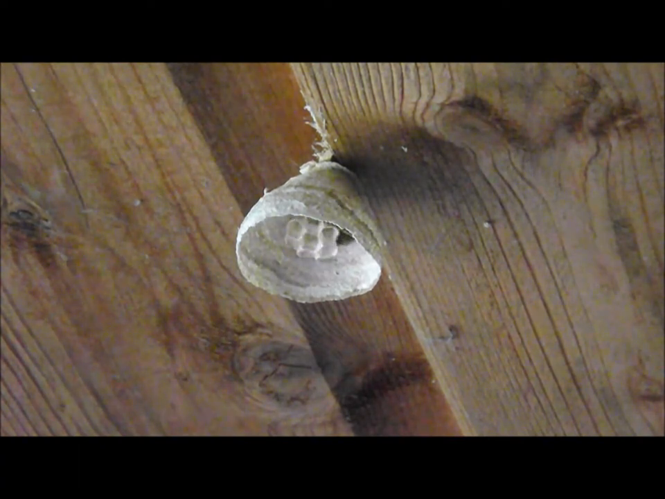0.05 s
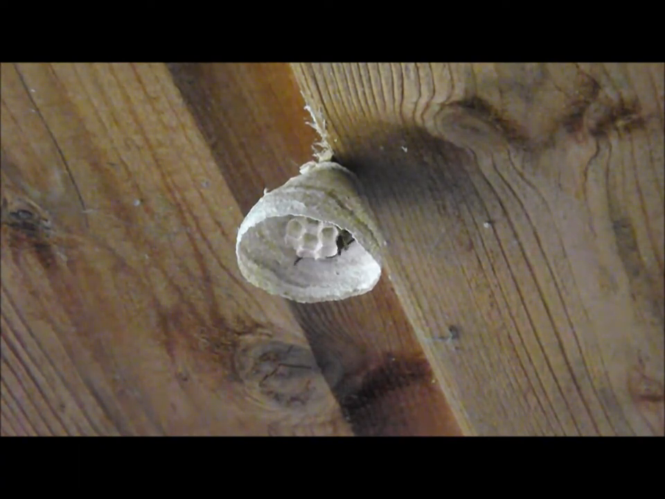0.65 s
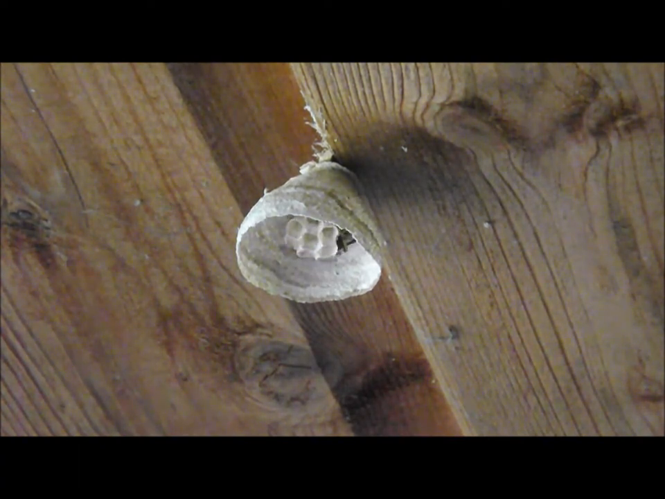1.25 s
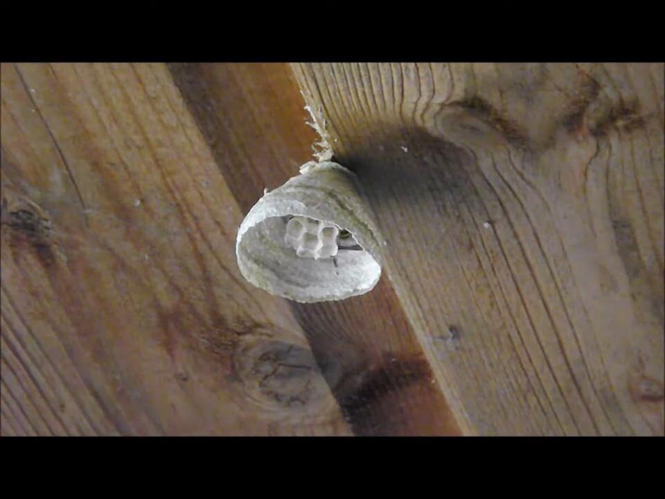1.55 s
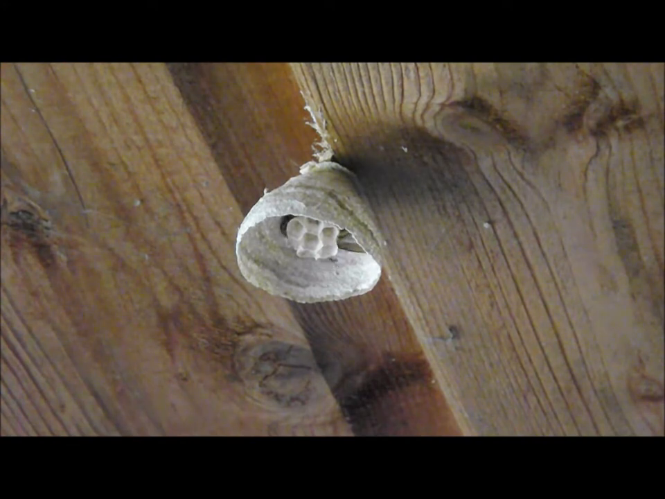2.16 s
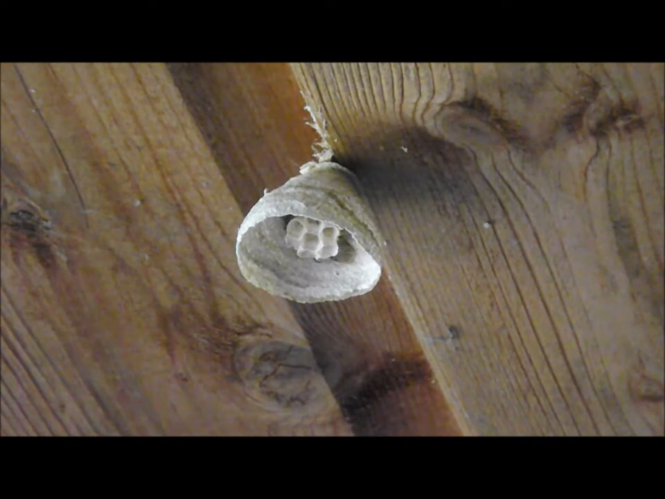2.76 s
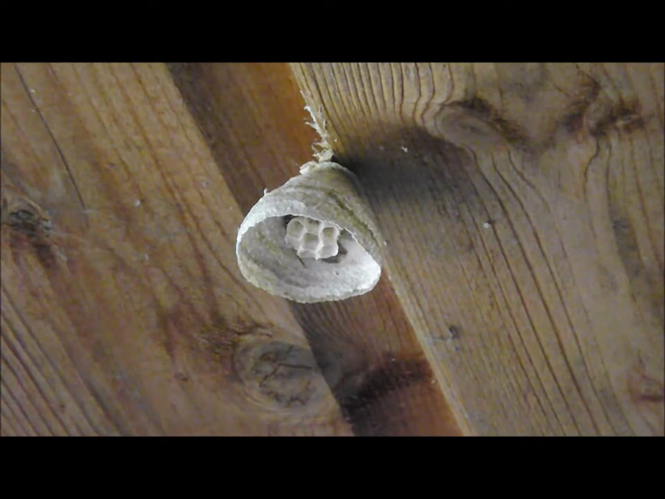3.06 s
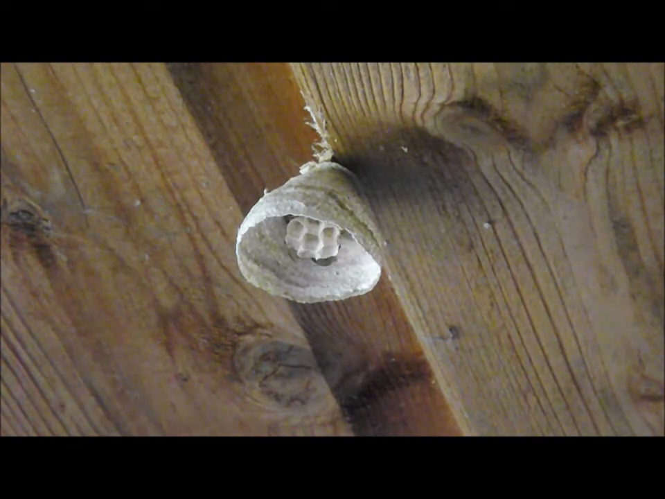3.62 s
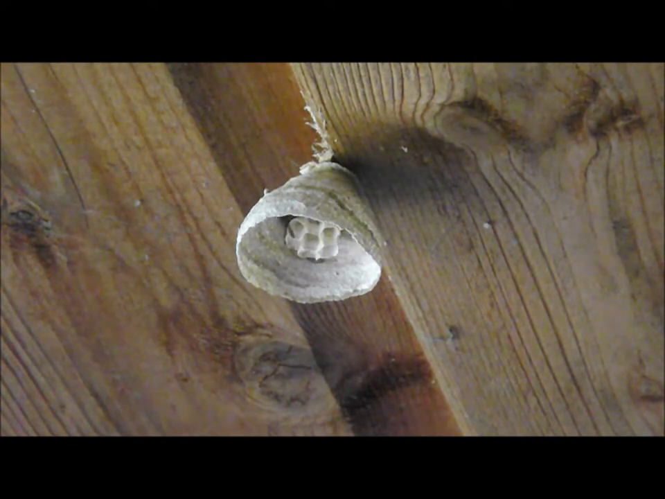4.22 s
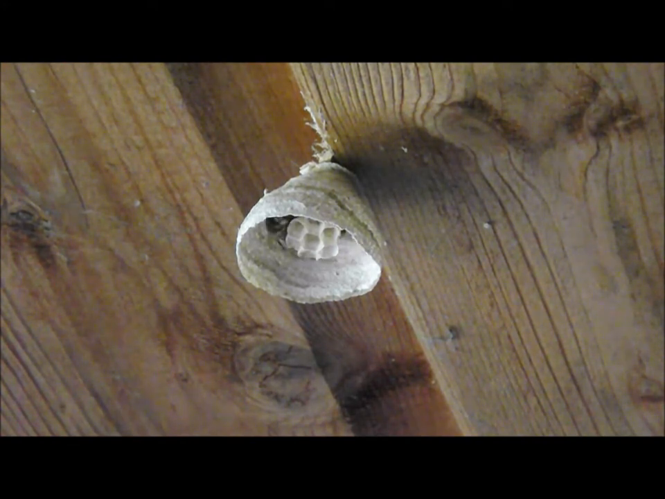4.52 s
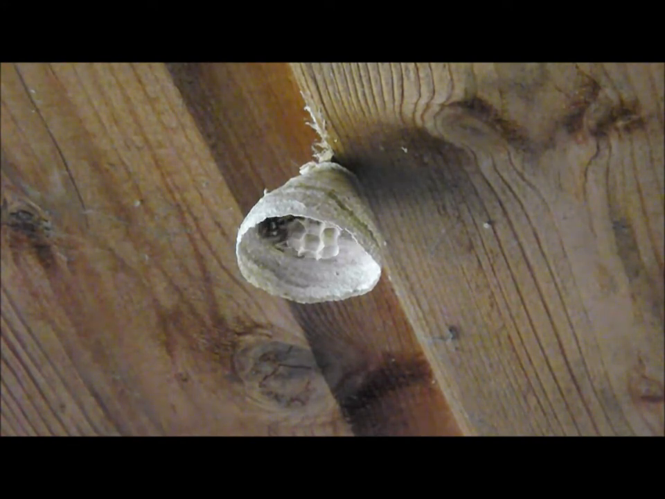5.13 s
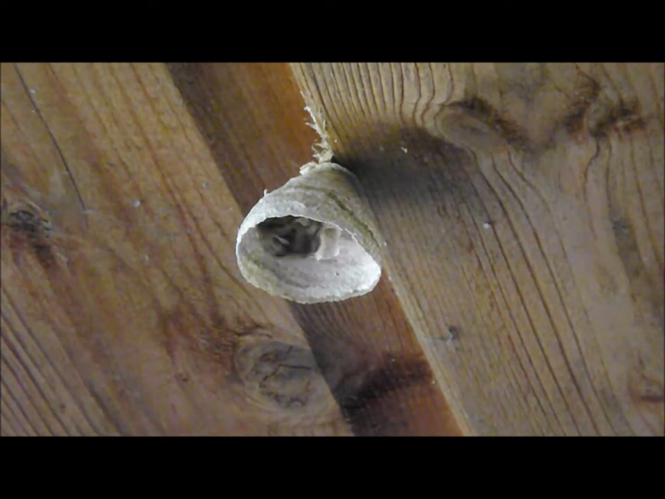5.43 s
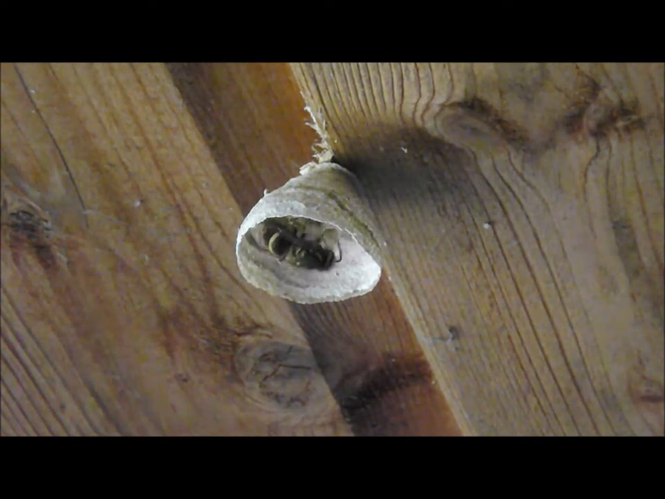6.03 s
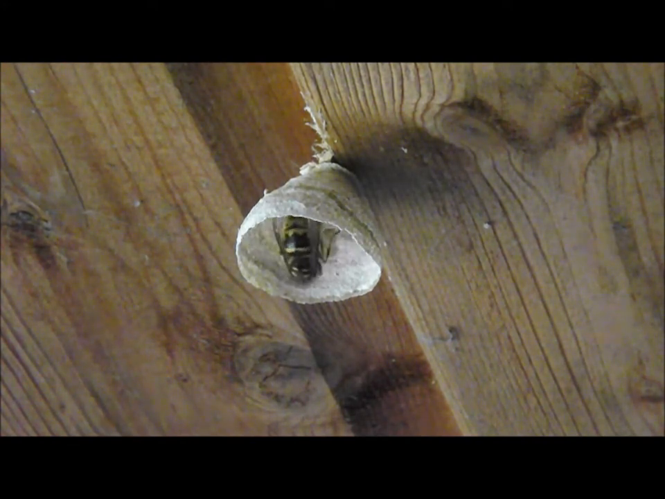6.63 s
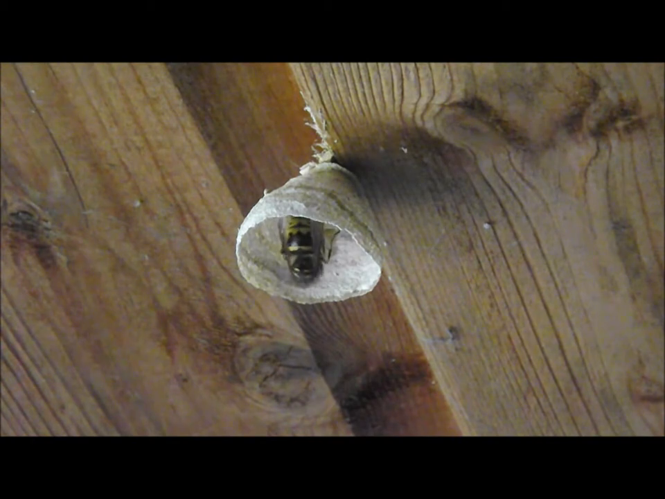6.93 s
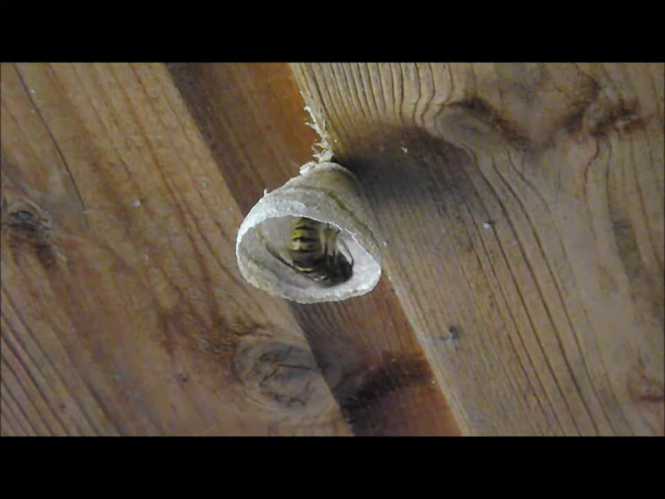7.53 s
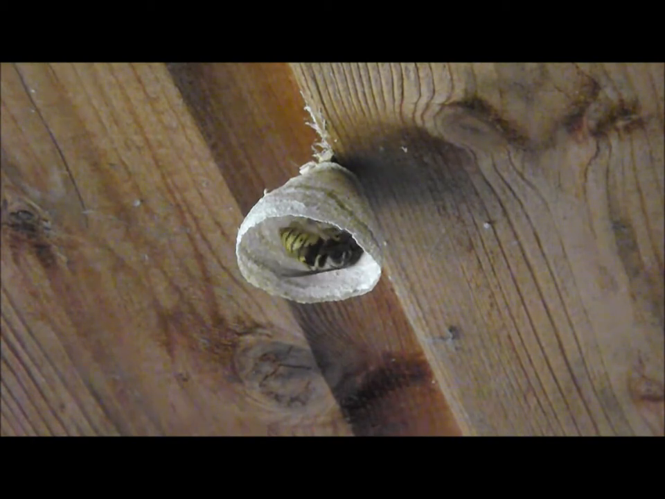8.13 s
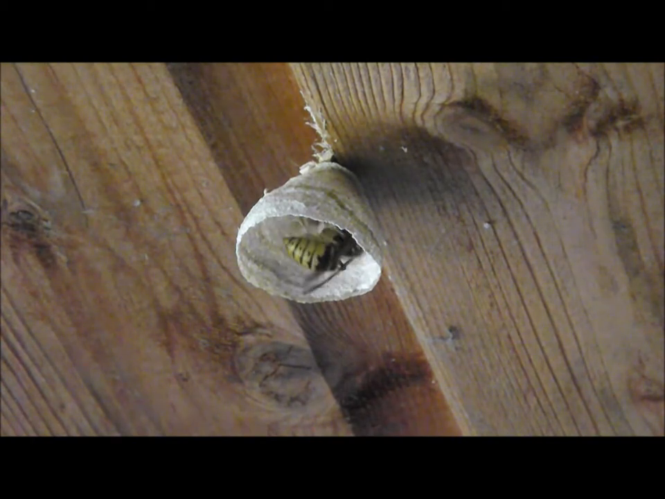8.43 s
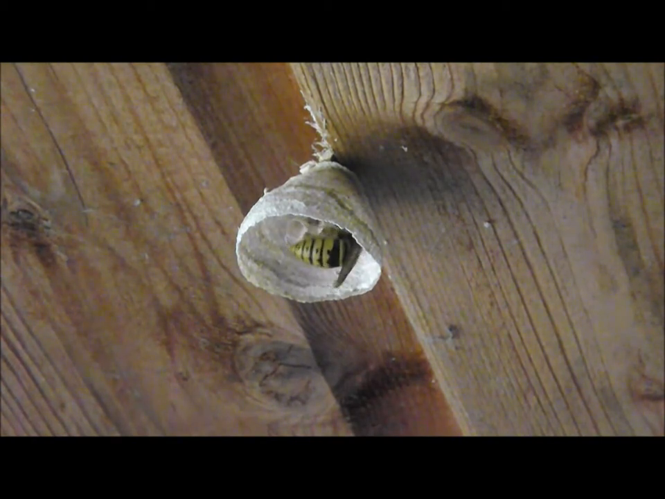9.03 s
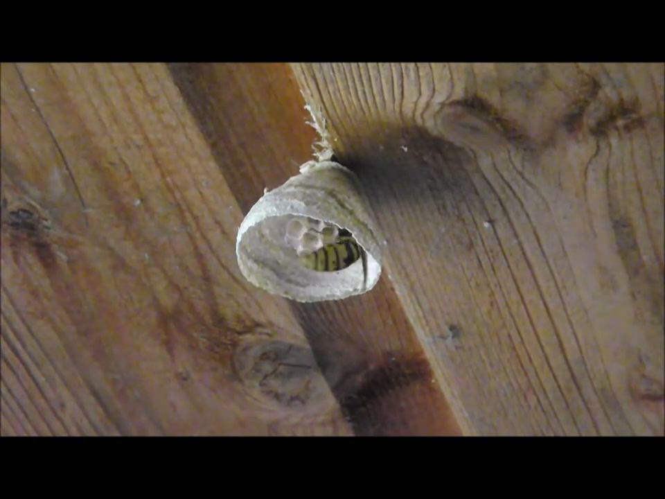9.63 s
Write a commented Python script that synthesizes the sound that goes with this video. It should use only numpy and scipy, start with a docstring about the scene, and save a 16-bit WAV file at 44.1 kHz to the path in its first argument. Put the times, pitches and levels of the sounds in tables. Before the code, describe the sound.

In a quiet wooden shed, a camera whirrs right at its own microphone with a thin, rapid, high ticking over soft hiss. Low traffic rumble comes through the boards throughout. A distant engine slowly rises in pitch, and small birds chirp faintly outside, mostly a little before the middle. The timber then gives two soft knocks, with a fainter one near the end.

```python
"""Camera running in a quiet shed

Under the roof of a wooden shed, heard from the camera's own stereo microphone.
Right at the microphone the works whirr in the case and ping once a frame, over a bed of hiss.
The timber gives a few soft knocks. From outside, through the boards, come a low traffic rumble,
a distant engine slowly speeding up, and the chirps of small birds."""
import sys
import numpy as np
from scipy import signal
from scipy.fft import rfft, irfft
from scipy.io import wavfile

SR = 44100
rng = np.random.default_rng(int(sys.argv[2]) if len(sys.argv) > 2 else 0)


def transcribe(u):
    """Save the signal u as a 16-bit wav file named by the first command-line argument.

    u: samples, shape (n,) or (channels, n), limited to [-1, 1]; the rate is SR.
    q: integer samples, one column per channel.
    """
    v = np.clip(np.atleast_2d(u).T, -1, 1)
    q = np.round(v * 32767).astype(np.int16)
    wavfile.write(sys.argv[1], SR, q)


N = 435266
TIME = np.arange(N) / SR
BIN_HZ = np.maximum(np.fft.rfftfreq(N, 1 / SR), 1)
FRAME_HZ = 29.4953

# resonances of the camera case: pitch_hz, width_hz, density_db
CASE_MODES = [(1072, 60, -82), (1511, 89, -84), (2053, 183, -84), (2437, 290, -80), (2712, 230, -74.5),
              (2800, 290, -77), (3123, 203, -73), (3330, 194, -74), (3777, 410, -82.5), (4344, 320, -88.5),
              (4680, 180, -92), (5280, 780, -102), (5880, 270, -103), (6250, 390, -102)]


def from_db(db):
    """Decibels to gain."""
    return 10 ** (np.asarray(db) / 20)


def arch(progress):
    """A smooth rise and fall as progress goes from 0 to 1."""
    return np.sin(np.pi * np.clip(progress, 0, 1))


def resonance(hz, width_hz):
    """Gain of a steep-sided resonance, 1 on top."""
    return 1 / (1 + (2 * (BIN_HZ - hz) / width_hz) ** 2)


def noise(gain):
    """Noise whose density per Hz follows the gain."""
    return irfft(rfft(rng.standard_normal(N)) * gain, N) * np.sqrt(SR / 2)


def coloured_noise(spectrum):
    """Noise whose spectrum runs through the given points."""
    hz, db = np.transpose(spectrum)
    return noise(from_db(np.interp(np.log(BIN_HZ), np.log(hz), db)))


def resonant_noise(modes):
    """Noise that excites each resonance of a body on its own."""
    power = sum((from_db(db) * resonance(hz, width)) ** 2 for hz, width, db in modes)
    return noise(np.sqrt(power))


def waver(rate_hz):
    """Slow random wavering up to the given rate; spread 1."""
    slow = noise(1 / (1 + (BIN_HZ / rate_hz) ** 4))
    return slow / slow.std()


def note(start_s, length_s, middle_hz, glide_hz, db, bend=0):
    """A near-sine note that glides through its middle pitch; both ends sag by the share bend."""
    progress = np.clip((TIME - start_s) / length_s, 0, 1)
    hz = middle_hz * (1 - bend * (2 * progress - 1) ** 2) + glide_hz * (progress - .5)
    return from_db(db) * arch(progress) ** .5 * np.sin(2 * np.pi * np.cumsum(hz) / SR)


def microphone_hiss(shared_power=.68):
    """The microphone's own noise, partly common to the two channels."""
    # noise floor: frequency_hz, density_db
    floor = [(200, -120), (1000, -107), (2000, -101), (4000, -101), (5200, -104), (7000, -103.7),
             (10000, -103.3), (13000, -105.7), (15700, -107.8)]
    common = coloured_noise(floor)
    separate = np.array([coloured_noise(floor), coloured_noise(floor)])
    return np.sqrt(shared_power) * common + np.sqrt(1 - shared_power) * separate


def far_traffic(drone_rise_hz_per_s=3.2):
    """Far traffic: a swelling bass rumble with passing drones, under a soft wash."""
    # rumble through the boards: frequency_hz, density_db
    rumble_spectrum = [(10, -54.5), (22, -50.5), (35, -52), (48, -54.5), (66, -60), (76, -58.5),
                       (90, -63.5), (102, -68.5), (160, -84), (400, -104), (2000, -140)]
    # wash of traffic and air: frequency_hz, density_db
    wash_spectrum = [(100, -82), (200, -80), (270, -84), (315, -81.5), (390, -86), (900, -86),
                     (1750, -88.5), (2300, -91.5), (5000, -114), (9000, -135)]
    # slow swell of the outdoors: time_s, rumble_gain_db, wash_gain_db
    swell = [(0, -2, -0.5), (.8, 2.5, -0.5), (1.8, -2, 0), (3, 0, -.5), (4.5, 0.5, -0.7), (5.7, -0.5, -0.5),
             (6.5, 1.5, 0.5), (7.5, -1, 0.5), (8.2, 2, 1.5), (8.8, 0, 0.2), (9.87, 0, 1.5)]
    # brief low drones: start_s, length_s, pitch_hz, level_db
    drone_notes = [(0.452, 0.46, 76.5, -43), (2.552, 0.56, 75.5, -45), (6.646, 0.89, 60, -39.5),
                   (7.957, 1.13, 83, -44.5), (8.895, 0.86, 44.4, -33.5)]
    time_s, rumble_db, wash_db = np.transpose(swell)
    rumble = from_db(np.interp(TIME, time_s, rumble_db)) * coloured_noise(rumble_spectrum)
    wash = from_db(np.interp(TIME, time_s, wash_db)) * coloured_noise(wash_spectrum)
    drones = sum(note(start, length, hz, drone_rise_hz_per_s * length, db)
                 for start, length, hz, db in drone_notes)
    return rumble + wash + drones


def distant_engine(start_hz=26.43, octaves_per_s=.26, second_db=-25, throb_hz=8, throb_db=1.0):
    """An engine speeds up; only its firing tone and a faint second harmonic get through the walls."""
    # the sound arrives in waves: start_s, length_s, level_db
    waves = [(2.05, 0.57, -35.5), (2.502, 0.58, -28), (3.05, 0.55, -31), (3.346, 0.65, -24.5),
             (3.908, .41, -25), (4.52, .48, -28), (4.878, 0.43, -31), (5.404, 0.43, -34.5)]
    firing_hz = start_hz * 2 ** (octaves_per_s * (TIME - waves[0][0]))
    phase = 2 * np.pi * np.cumsum(firing_hz) / SR
    tone = np.sin(phase) + from_db(second_db) * np.sin(2 * phase)
    swells = [from_db(db) * arch((TIME - start) / length) ** .58 for start, length, db in waves]
    throb = from_db(throb_db * waver(throb_hz))
    return np.sqrt(2) * np.max(swells, axis=0) * throb * tone


def birds(chip_s=.0325, lower_voice_ratio=.872, flutter_hz=60, flutter_db=3.0):
    """Two birds outside: fluttering whistles, and quick chips sung with both sides of the syrinx."""
    # first bird: start_s, length_s, pitch_hz, glide_hz, level_db
    whistles = [(0.317, 0.04, 3130, 90.5, -40.5), (1.34, .025, 3920, 80, -47),
                (3.727, 0.073, 3146, -30, -33), (3.792, 0.049, 3060, -210, -40.5),
                (3.913, 0.047, 3430, 170, -38.5), (4.012, 0.03, 3170, 160, -37.5),
                (4.148, 0.068, 3800, 70, -44.5), (4.245, 0.055, 3420, 90, -47),
                (7.169, 0.047, 3155, 19.5, -43), (9.676, 0.019, 3840, -60, -45.5)]
    # second bird: middle_s, upper_pitch_hz, level_db
    chips = [(3.058, 4490, -54), (3.118, 4580, -60), (3.16, 4550, -60), (3.22, 4630, -55),
             (3.278, 4660, -56), (3.334, 4640, -55), (3.408, 4630, -52), (3.486, 4540, -55),
             (3.708, 4640, -58)]
    song = sum(note(*whistle, bend=.01) for whistle in whistles)
    for middle_s, upper_hz, db in chips:
        for hz in (upper_hz, upper_hz * lower_voice_ratio):
            song += note(middle_s - chip_s / 2, chip_s, hz, glide_hz=80, db=db, bend=.028)
    flutter = noise(resonance(flutter_hz, width_hz=flutter_hz))
    return song * from_db(flutter_db * flutter / flutter.std())


def garden_echoes(direct, t60_s=.55, wet_db=-10):
    """The garden and the shed walls add a diffuse tail."""
    tail = rng.standard_normal(SR // 2) * from_db(-60 * TIME[:SR // 2] / t60_s)
    return direct + from_db(wet_db) * signal.fftconvolve(direct, tail / np.linalg.norm(tail))[:N]


def timber_knocks(t60_s=.19, rise_s=.003):
    """The shed's timber settles with soft, gritty knocks that die away."""
    # knocks: start_s, gain_db
    knocks = [(4.783, -1.5), (5.275, -6), (8.485, -12)]
    # resonances of the wood: pitch_hz, width_hz, density_db
    timber_modes = [(322, 62, -65), (500, 130, -81), (801, 170, -72), (1451, 300, -77.5),
                    (2960, 1000, -65.5), (4400, 600, -86)]
    envelope = np.zeros(N)
    for start_s, db in knocks:
        age_s = np.maximum(TIME - start_s, 0)
        envelope += np.minimum(age_s / rise_s, 1) * from_db(db - 60 * age_s / t60_s)
    return resonant_noise(timber_modes) * envelope


def frame_ticks(highpass_hz=9000, uneven_db=1.2):
    """The camera's frame clock leaks into the sound as a faint, thin buzz."""
    # electrical ticks around the onset of each ping: offset_s, level_db
    ticks = [(-.00157, -39), (-.00095, -39.5), (-.00033, -42)]
    frame_starts_s = np.arange(1, int(N / SR * FRAME_HZ)) / FRAME_HZ
    clicks = np.zeros(N)
    for offset_s, db in ticks:
        at = np.round((frame_starts_s + offset_s) * SR).astype(int)
        clicks[at] += from_db(db + uneven_db * rng.standard_normal(len(at)))
    return signal.sosfilt(signal.butter(1, highpass_hz, "high", fs=SR, output="sos"), clicks)


def camera_whirr(ring_hz=1214, ring_width_hz=118, ring_db=-60, flutter_hz=6, flutter_db=2.0):
    """The works whirr steadily in the case, while one resonance flutters and now and then surges."""
    # surges of that resonance: middle_s, length_s, rise_db
    surges = [(0.38, 0.18, 8), (1.353, .25, 6), (3.05, .13, 5.5), (6.75, 1, 2), (8.17, 0.43, 5),
              (9.36, .22, 5.5)]
    surge_db = sum(db * arch((TIME - middle) / length + .5) for middle, length, db in surges)
    ring = noise(resonance(ring_hz, ring_width_hz))
    steady = resonant_noise(CASE_MODES)
    ring_gain = from_db(ring_db + surge_db + flutter_db * waver(flutter_hz))
    return steady + ring_gain * ring / ring.std()


def actuator_pings(ping_hz=2850, ping_db=-33.5, uneven_db=.5, rebound_db=-18):
    """Once a frame a small actuator close to the microphone gives a short ping and a weak rebound."""
    length_s, lead_s, rebound_s = .0046, .0013, .0032
    frame, fraction = np.divmod((TIME + lead_s) * FRAME_HZ, 1)
    age_s = fraction / FRAME_HZ
    strengths = from_db(ping_db + uneven_db * rng.standard_normal(int(frame[-1]) + 1))
    strike = arch(age_s / length_s) ** 2
    rebound = from_db(rebound_db) * arch((age_s - rebound_s) / length_s)
    return strengths[frame.astype(int)] * (strike + rebound) * np.sin(2 * np.pi * ping_hz * age_s)


def scene(case_side_db=-25):
    """The camera up close, the shed around it and the outdoors beyond the boards."""
    camera = camera_whirr() + actuator_pings() + frame_ticks()
    # the case shakes each microphone port a little differently
    case_side = from_db(case_side_db) * resonant_noise(CASE_MODES) * np.array([[1], [-1]])
    shed = timber_knocks()
    outdoors = far_traffic() + distant_engine() + garden_echoes(birds())
    return camera + case_side + shed + outdoors + microphone_hiss()


def record(dry, lag_s=.000026, lag_above_hz=1900, mono_below_hz=1650, cutoff_hz=15700):
    """The right microphone leads slightly, the image narrows to mono in the bass, the top is cut."""
    half_phase = np.pi * BIN_HZ * lag_s / (1 + (lag_above_hz / BIN_HZ) ** 6)
    left, right = rfft(dry) * np.exp(1j * half_phase * np.array([[-1], [1]]))
    mid = (left + right) / 2
    side = (left - right) / 2 / np.sqrt(1 + (mono_below_hz / BIN_HZ) ** 20)
    lowpass = np.clip((cutoff_hz - BIN_HZ) / 100 + .5, 0, 1)
    return irfft(np.array([mid + side, mid - side]) * lowpass, N)


dry = scene()
out = record(dry)
transcribe(out)
```